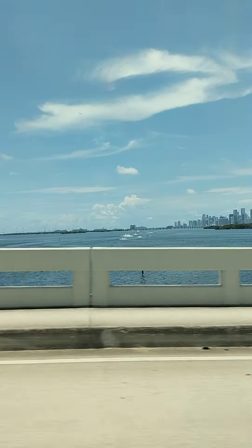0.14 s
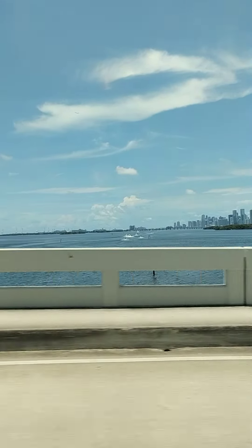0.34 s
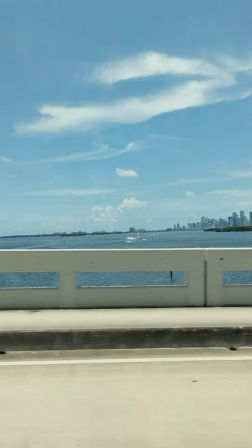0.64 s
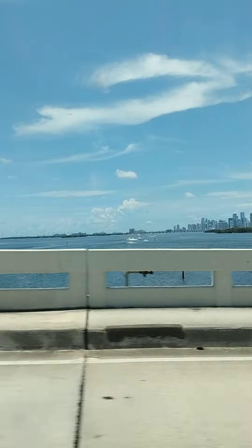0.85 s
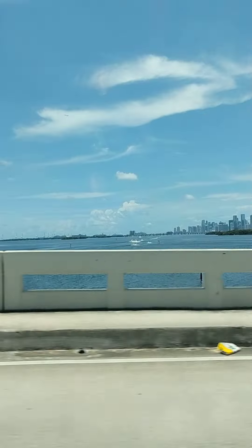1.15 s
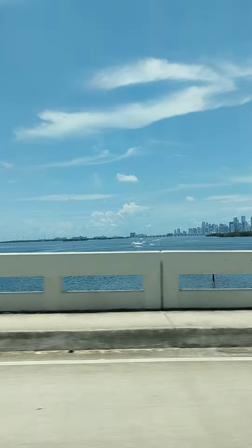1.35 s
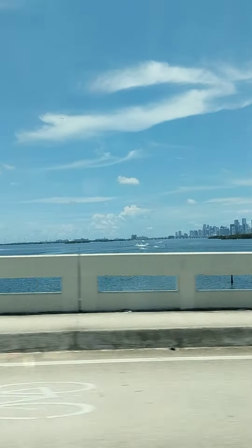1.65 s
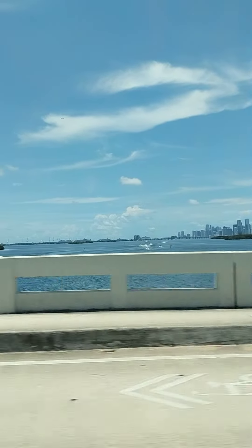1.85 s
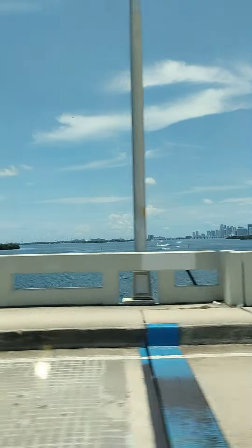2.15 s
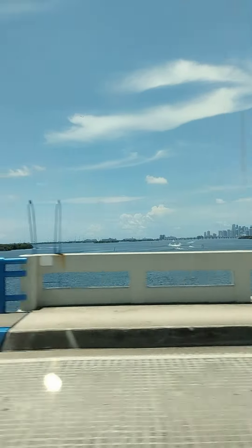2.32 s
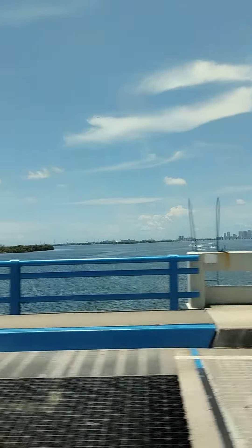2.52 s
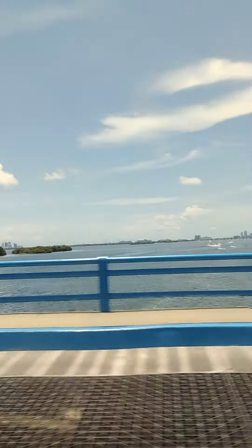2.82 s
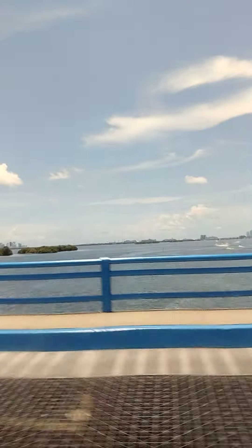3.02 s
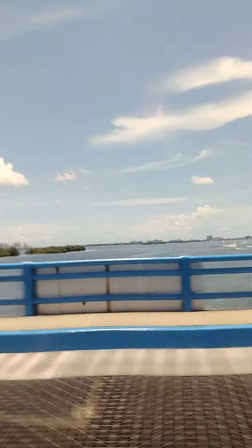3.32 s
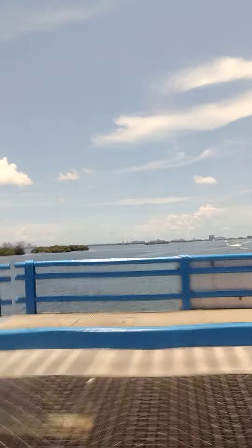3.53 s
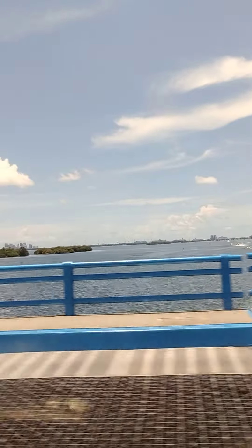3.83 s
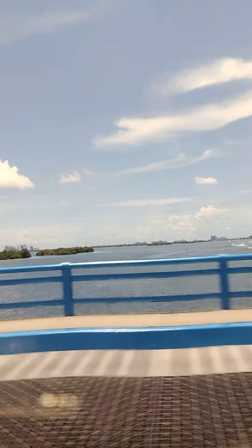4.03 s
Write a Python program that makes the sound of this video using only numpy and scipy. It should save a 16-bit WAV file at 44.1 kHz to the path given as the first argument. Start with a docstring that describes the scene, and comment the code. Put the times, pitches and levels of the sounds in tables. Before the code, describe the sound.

Car cabin road rumble with a few soft bumps, a short rasp, then a deep buzzing grate hum with jolts and small metallic clinks.

```python
"""Inside a car that crosses a concrete bridge and rolls onto an open steel grate deck.
Coloured noise gives the tyre rumble, the hiss and the thumps of rough patches; a ribbed slab rasps the tread.
On the grate the bars slap the tread: impulses ring body resonances, and sines drone on the bar rate and its octave.
Small loose metal ticks and clinks as decaying modes; trim knocks, buzzes and squeaks, and soft things scuff."""
import sys
import numpy as np
from scipy import signal
from scipy.fft import rfft, irfft, next_fast_len
from scipy.io import wavfile
from scipy.ndimage import uniform_filter1d

SR = 44100
rng = np.random.default_rng(int(sys.argv[2]) if len(sys.argv) > 2 else 0)


def generate_wav(signal):
    """Clip the signal to [-1, 1] and save it as 16-bit WAV at the path in sys.argv[1]."""
    frames = np.transpose(np.atleast_2d(signal))
    scaled = np.clip(frames, -1, 1) * 32767
    pcm = np.round(scaled).astype(np.int16)
    wavfile.write(sys.argv[1], SR, pcm)


N = 184117
TIME = np.arange(N) / SR

# Stereo field of the cabin: (frequency [Hz], left-right correlation [1], left-right balance [dB])
STEREO_FIELD = [(100, 1, 0.9), (280, 0.98, 0), (399, 0.88, 0), (563, 0.89, 5), (1012, 0.18, 2.5),
                (2200, 0, 0.5), (4170, 0, 1), (5600, 0.085, -10), (7000, 0, -4), (8700, 0.14, 14.5),
                (10500, 0.16, 11), (12500, 0.09, 2), (14840, 0, -1)]

# Roughness of the road, driving rumble and hiss: (time [s], rumble level [dB])
ROAD_ROUGHNESS = [(0.0, -30.5), (0.95, -30.5), (1.6, -32), (1.95, -31), (2.15, -29), (3.2, -33)]
# Spectrum of the road rumble: (frequency [Hz], relative density [dB per Hz])
ROAD_SPECTRUM = [(20, -19.5), (48, -16.5), (75, -7), (118, 0), (150, -5.5), (177, -4), (200, -10),
                 (300, -10), (350, -9.5), (385, -14), (425, -11), (510, -25.5), (650, -28.5), (800, -35)]
# Spectrum of tread and wind hiss: (frequency [Hz], relative density [dB per Hz])
HISS_SPECTRUM = [(500, 1.5), (780, 1), (1020, 0), (1250, -3.5), (1600, -10.5), (2200, -11.5), (2700, -18),
                 (3300, -24), (4300, -29), (6500, -26.5), (8000, -35), (9300, -30), (12000, -44.5),
                 (16000, -42.5)]
HISS_DB = -18   # tread and wind hiss through the glass, relative to the rumble
# Rough patches in the concrete: (time [s], level [dB], rise [s], t60 [s])
ROUGH_PATCHES = [(.86, -27.5, 0.029, 0.48), (0.944, -25.5, 0.01, 0.3), (1.061, -21, 0.016, 0.38),
                 (1.139, -31.5, 0.019, 0.33), (1.76, -34, 0.012, 0.76)]
# Spectrum of their thumps: (frequency [Hz], relative density [dB per Hz])
THUMP_SPECTRUM = [(25, -6.5), (50, -7), (80, -2), (120, 5.5), (180, -14), (300, -7.5), (450, -21.5),
                  (700, -29), (1100, -32)]

# Light ticks of dangling metal: (time [s], relative rms level [dB], frequency that rings most [Hz])
METAL_TICKS = [(.229, -46.5, 7160), (.441, -56.5, 8530), (.598, -59.5, 7110), (.814, -57, 10300),
               (1.222, -51.5, 7110), (1.4995, -61, 8600), (1.692, -54.5, 8850), (1.956, -53.5, 5840),
               (2.175, -43, 6340), (2.3905, -40, 6900), (2.713, -44.5, 7000), (2.749, -56.5, 8500),
               (2.958, -50, 7100), (3.008, -62, 9300), (3.509, -50, 5440), (3.626, -47, 8240),
               (4.005, -34.5, 8900), (4.036, -47, 8800), (4.052, -55, 9400), (4.152, -52.5, 8800)]
# Modes of the dangling metal: (frequency [Hz], relative level [dB], t60 [s], left-right balance [dB])
DANGLING_MODES = [(5480, 5, 0.039, -11), (6280, -4.5, 0.03, -12.5), (7130, -2.5, 0.073, -13),
                  (7210, -9, .04, 4), (8800, -3.5, .04, 16.5), (9200, -15, .02, 18.5),
                  (10330, -14, .03, 10.5), (14550, -12, .02, 0), (15400, -20.5, .02, -3)]
# Keys swinging together: (time [s], relative rms level [dB], frequency that rings most [Hz])
KEY_CLINKS = [(3.742, -35, 7450), (3.748, -35.5, 7450), (3.778, -38, 8820), (3.787, -39, 14900),
              (4.074, -54.5, 14900)]
# Modes of the keys: (frequency [Hz], relative level [dB], t60 [s], left-right balance [dB])
KEY_RING_MODES = [(2630, -8, 0.06, -4), (5650, -0.5, 0.22, -9), (6980, -14, 0.064, -11),
                  (7490, -4.5, 0.12, 18), (8450, -8, .09, 8), (8820, -6, 0.13, 18), (9400, -6, .04, 18),
                  (10500, -13, .04, 16), (11430, -6, 0.13, 11), (14300, -10, .04, -1),
                  (14900, -11, .12, -8)]
# Dry crack of metal on metal: (frequency [Hz], relative density [dB per Hz])
CRACK_SPECTRUM = [(3000, -11), (4600, -4), (5800, 4.5), (7200, -0.5), (7900, -13), (9400, -0.5),
                  (11500, -11), (13500, -13.5), (15500, -7.5)]
# Trim knocking and chattering: (time [s], level [dB], rise [s], t60 [s], relative treble [dB])
TRIM_KNOCKS = [(2.465, -51, 0.0078, 0.17, -14), (3.742, -41.5, 0.0085, 0.079, 12),
               (3.778, -30, 0.0055, 0.07, -1), (3.934, -35, 0.00092, 0.024, -13),
               (3.949, -31, 0.0017, 0.032, 10), (3.955, -29.5, 0.0039, 0.19, -12),
               (3.964, -35.5, 0.0018, 0.045, 22), (3.988, -38.5, .005, 0.15, -15)]
# Spectrum of the knocks: (frequency [Hz], relative density [dB per Hz])
KNOCK_SPECTRUM = [(600, 14), (1300, 2), (2000, 4), (2500, 0.5), (3600, -7.5), (4500, -12), (5600, -4),
                  (7500, -24), (9500, -11.5), (11500, -27), (15500, -28)]
# Soft things sliding in the cabin: (time [s], level [dB], rise [s], t60 [s], relative treble [dB])
SOFT_SCUFFS = [(0.0, -42, 0.0061, 0.14, 8), (.21, -55.5, .02, 0.32, 5), (.475, -57.5, .015, .15, -7),
               (.785, -52, 0.0031, 0.41, 2), (1.695, -62, .015, 0.66, -10),
               (2.06, -58.5, 0.022, 0.58, -3.5), (2.74, -62, 0.024, 0.61, 10.5),
               (3.84, -47, 0.025, 0.21, -31)]
# Spectrum of the scuffs: (frequency [Hz], relative density [dB per Hz])
SCUFF_SPECTRUM = [(2000, -11.5), (3100, -1), (3850, -1), (4600, -3.5), (6300, -13), (7800, -15),
                  (9400, -13.5), (11500, -30), (16000, -29)]
# Trim squeaking and creaking: (time [s], frequency [Hz], nominal width [Hz], level [dB], t60 [s])
TRIM_SQUEAKS = [(.79, 3820, 9, -60, .75), (3.494, 1800, 400, -52, .06), (3.507, 1620, 220, -39.5, .07),
                (3.51, 5800, 600, -46, .05), (3.525, 1800, 400, -43.5, .08)]
# Spectrum of the buzzing trim: (frequency [Hz], relative density [dB per Hz])
BUZZ_SPECTRUM = [(800, -5), (1500, -1), (1850, -9.5), (2400, -3), (3500, -12.5), (5300, -19.5), (7500, -25),
                 (9400, -24), (11500, -32), (16000, -35)]
# The stronger buzz around the second joint
BUZZ_START_S, BUZZ_DB, BUZZ_RISE_S, BUZZ_T60_S = 3.563, -46, 0.36, 7.7
BUZZ_ON_DECK_DB = -40.5   # faint buzz all along the grate, relative to the shaking

# Rasp of the ribbed lead-in: (frequency [Hz], relative density [dB per Hz])
RIBS_SPECTRUM = [(750, -4.5), (980, 8.5), (1300, -1), (1700, -15.5), (2300, -15.5), (2900, -19)]
RIBS_END_S = 2.47   # the front tyres rasp most as they leave the ribs
RIBS_DB, RIBS_REAR_DB = -43.5, -4.5   # peak level; rear axle relative to the front
RIBS_RISE_DB_PER_S, RIBS_FALL_DB_PER_S = 73, 129.5

# How hard the deck shakes the car: (time [s], reference level [dB])
DECK_SHAKING = [(2.25, -35.5), (2.42, -29.5), (2.65, -22), (2.9, -20.5), (3.1, -21.5), (3.6, -22),
                (3.8, -20.5), (4.17, -19.5)]
# Spectrum of the deck roar: (frequency [Hz], relative density [dB per Hz])
ROAR_SPECTRUM = [(165, 7), (200, -1.5), (250, 2), (300, 0.5), (370, -3.5), (450, -14), (520, -12),
                 (690, -16.5), (770, -27.5), (900, -48.5)]
# Spectrum of the body heaving: (frequency [Hz], relative density [dB per Hz])
HEAVE_SPECTRUM = [(12, -19.5), (25, -11.5), (40, -7.5), (50, -3), (60, -5), (75, -27.5)]
# Rate at which the tyres meet bars: (time [s], bar rate [1/s])
BARS_PER_S = [(2.35, 68), (2.55, 70), (2.9, 73), (3.15, 74), (3.35, 76), (3.62, 73.5), (3.8, 75),
              (4.17, 73.5)]
# Hum on the octave of the bar rate: (time [s], level [dB])
HUM_LEVEL = [(2.15, -20.5), (2.3, -25), (2.48, -15.5), (3.0, -15), (3.38, -9.5), (3.62, -13), (3.75, -15),
             (4.17, -22.5)]
# Brief sags of the hum: (time [s], half length [s])
HUM_SAGS = [(2.62, 0.026), (2.742, 0.0099), (2.855, 0.011), (2.982, 0.027), (3.122, .025), (3.343, 0.02),
            (3.465, 0.034), (3.677, 0.019)]
SAG_DEPTH_DB = 13
# Cabin modes that boom along with the hum: (frequency [Hz], level relative to the hum [dB])
CABIN_BOOMS = [(299.5, -11.8), (370, -20.5)]
# Panel, glass and air resonances: (frequency [Hz], nominal width [Hz], relative level [dB])
PANEL_MODES = [(177, 32, 2.5), (228, 30, 1), (272.6, 18, -4), (301.4, 19, -0.5), (337.3, 22, -4),
               (371.3, 18, -3.5), (451, 40, -5), (555, 74, -18.5), (668, 55, -21), (1180, 190, -29.5),
               (2215, 120, -33)]
# Resonances of the shaking wheels: (frequency [Hz], nominal width [Hz], relative level [dB])
WHEEL_RESONANCES = [(96, 14, -2), (120.5, 13.9, -1)]
# Joints across the deck: (time [s], heave [dB], wheel shake [dB], reference judder [dB])
DECK_JOINTS = [(2.315, -39, -28.5, -30.5), (3.737, -28, -15.5, -23)]
JOINT_RISE_S, JOINT_T60_S = 0.021, 0.81
AXLE_LAG_S = .205   # the rear axle follows the front
WHEEL_TURNS_PER_S, THROB_LOW_S = 5.95, 2.675   # turning rate; a moment when the throb is lowest
THROB_SHARE = 0.35   # the lowest note throbs once per wheel turn

CUTOFF_HZ = 15900


def from_db(db):
    """Logarithmic level: decibels to amplitude gain."""
    return 10 ** (np.asarray(db) / 20)


def rms_one(x):
    """Power normalisation: scale to unit mean square."""
    return x / np.sqrt(np.mean(x ** 2) + 1e-20)


def in_time(rows):
    """Linear interpolation: each column of a curve at every sample."""
    times, *columns = np.transpose(rows)
    return [np.interp(TIME, times, column) for column in columns]


def at_hz(rows, hz):
    """Interpolation over log frequency: each column of a spectrum at the given frequencies."""
    points, *columns = np.transpose(rows)
    return [np.interp(np.log(hz + 1e-3), np.log(points), column) for column in columns]


def pan(db):
    """Constant-power panning: left and right gains for a level difference."""
    gains = from_db(np.array([np.atleast_1d(db), -np.atleast_1d(db)]) / 2)
    return gains / np.sqrt(np.mean(gains ** 2, axis=0))


def drift(rate_hz):
    """Low-passed noise: a slow random fluctuation of unit spread."""
    hz = np.fft.rfftfreq(2 * N, 1 / SR)[:2000]
    spectrum = rfft(rng.standard_normal(2 * len(hz) - 2))
    slow = irfft(spectrum / (1 + (hz / rate_hz) ** 2))
    return rms_one(np.interp(np.linspace(0, len(hz), N), np.arange(len(slow)), slow))


def steady(x, seconds):
    """Running power normalisation: near unit power over every stretch of this length."""
    power = np.mean(np.atleast_2d(x) ** 2, axis=0)
    return x / np.sqrt(uniform_filter1d(power, max(int(seconds * SR), 2)) + 1e-12)


def swell(start_s, rise_s, t60):
    """Exponential decay: a straight rise, then a fall of 60 dB per t60."""
    out = np.zeros(N)
    sounding = slice(max(int(start_s * SR), 0), int((start_s + rise_s + 1.5 * t60) * SR))
    age = np.maximum(TIME[sounding] - start_s, 0)
    decay = np.exp(-np.log(1000) * np.maximum(age - rise_s, 0) / t60)
    out[sounding] = np.minimum(age / rise_s, 1) * decay
    return out


def resonate(x, hz, width_hz):
    """Damped resonance: a pole pair with gain 1 at its peak."""
    r = np.exp(-np.pi * width_hz / SR)
    zeros = np.array([1, 0, -1]) * (1 - r * r) / 2
    poles = [1, -2 * r * np.cos(2 * np.pi * hz / SR), r * r]
    return signal.lfilter(zeros, poles, x + 1e-18)


def cabin_noise(colour):
    """Diffuse-field coherence: coloured stereo noise, alike on both sides in the bass, diffuse in the treble."""
    size = next_fast_len(N)
    hz = np.fft.rfftfreq(size, 1 / SR)
    mid, side = rfft(rng.standard_normal((2, size)))
    alike, balance_db = at_hz(STEREO_FIELD, hz)
    alike = np.clip(alike, -1, 1)
    both = np.sqrt(1 + alike) * mid + np.sqrt(1 - alike) * side * [[1], [-1]]
    # fade out beyond both ends of the spectrum table
    top = 1 / (1 + (hz / colour[-1][0] / 1.2) ** 8)
    bottom = 1 / (1 + (colour[0][0] / 1.2 / (hz + 1)) ** 8)
    shaped = both * pan(balance_db) * top * bottom * from_db(at_hz(colour, hz)[0])
    return rms_one(irfft(shaped, size)[:, :N])


def jolts():
    """Transient excitation: heave, wheel shake and judder as front, then rear axle strikes each joint."""
    out = 0
    for joint_s, *levels_db in DECK_JOINTS:
        for lag_s in (0, AXLE_LAG_S):
            out = out + from_db(levels_db)[:, None] * swell(joint_s + lag_s, JOINT_RISE_S, JOINT_T60_S)
    return out


def road():
    """Random excitation: coarse concrete shakes the body, rough patches thump; tread and wind hiss above."""
    road_db, = in_time(ROAD_ROUGHNESS)
    bumps = sum(from_db(db) * swell(start_s, rise_s, t60) for start_s, db, rise_s, t60 in ROUGH_PATCHES)
    thumps = bumps * steady(cabin_noise(THUMP_SPECTRUM), seconds=0.14)
    rumble = from_db(road_db) * steady(cabin_noise(ROAD_SPECTRUM), seconds=.06)
    rolling_hiss = from_db(road_db + HISS_DB + 0.89 * drift(10.0))
    joint_hiss = from_db(-20.0) * jolts()[0]   # follows the heave at the joints
    hiss = np.hypot(rolling_hiss, joint_hiss) * cabin_noise(HISS_SPECTRUM)
    return rumble + thumps + hiss


def trim_buzz():
    """Vibration-driven contact noise: trim buzzes with the deck, far more around the second joint."""
    jolted = from_db(BUZZ_DB) * swell(BUZZ_START_S, BUZZ_RISE_S, BUZZ_T60_S)
    shaken = from_db(in_time(DECK_SHAKING)[0] + BUZZ_ON_DECK_DB)
    return np.hypot(jolted, shaken) * from_db(2.4 * drift(120)) * cabin_noise(BUZZ_SPECTRUM)


def bursts(hits, colour, grain_db):
    """Contact noise: grainy bursts swell and die, each with its own share of treble."""
    noise = cabin_noise(colour) * from_db(grain_db * drift(250))
    dull = signal.sosfilt(signal.butter(2, 4000, fs=SR, output="sos"), noise)
    bright = signal.sosfilt(signal.butter(2, 4600, "high", fs=SR, output="sos"), noise)
    out = 0
    for start_s, db, rise_s, t60, treble_db in hits:
        # opposite sign keeps the two bands from cancelling where they cross
        grain = rms_one(dull - from_db(treble_db) * bright)
        out = out + from_db(db) * swell(start_s, rise_s, t60) * grain
    return out


def squeak(hz, width_hz):
    """Stick-slip friction: noise through one sharp resonance, held at nearly even level."""
    once = resonate(rng.standard_normal((2, N)), hz, 1.9 * width_hz)
    twice = resonate(once, hz, 1.9 * width_hz)
    return steady(twice, seconds=min(2 / width_hz, .01))


def metal(hits, modes, chatter_s, favour_db, crack_db, crack_t60, uneven_db):
    """Modal excitation: a dry crack and a brief chatter into the modes; the place struck favours some."""
    cracks = sum(from_db(db + crack_db) * swell(start_s, 0.0014, crack_t60) for start_s, db, _ in hits)
    out = cracks * cabin_noise(CRACK_SPECTRUM)
    t = TIME[:SR // 7]
    for start_s, db, strong_hz in hits:
        sound = 0
        for hz, mode_db, t60, side_db in modes:
            contact = rng.standard_normal((2, len(t))) * np.exp(-t / chatter_s)
            width_hz = np.log(1000) / (np.pi * t60)
            ring = np.array([rms_one(channel) for channel in resonate(contact, hz, width_hz)])
            favoured = np.exp(-((hz - strong_hz) / 250) ** 2)
            level_db = mode_db + favour_db * favoured + uneven_db * rng.uniform(-1, 1)
            sound = sound + from_db(level_db) * pan(side_db) * ring
        sound = sound / np.sqrt(np.mean(sound[:, :SR // 50] ** 2))   # unit power over the first 20 ms
        start = int(start_s * SR)
        out[:, start:start + len(t)] += from_db(db) * sound[:, :N - start]
    return out


def loose_things():
    """Superposition: ticks, keys, squeaks, knocks, scuffs and buzz that the shaking sets off add up."""
    ticks = from_db(-3.5) * metal(METAL_TICKS, DANGLING_MODES, chatter_s=0.0036, favour_db=11.0,
                                  crack_db=-3.5, crack_t60=0.061, uneven_db=3.5)
    keys = from_db(-1.2) * metal(KEY_CLINKS, KEY_RING_MODES, chatter_s=.003, favour_db=11.0,
                                 crack_db=-1.8, crack_t60=.085, uneven_db=1.0)
    squeaks = 0
    for start_s, hz, width_hz, db, t60 in TRIM_SQUEAKS:
        squeaks = squeaks + from_db(db) * swell(start_s, 0.004, t60) * squeak(hz, width_hz)
    knocks = bursts(TRIM_KNOCKS, KNOCK_SPECTRUM, grain_db=-1.5)
    scuffs = bursts(SOFT_SCUFFS, SCUFF_SPECTRUM, grain_db=1.5)
    return ticks + keys + squeaks + knocks + scuffs + trim_buzz()


def ribs():
    """Tread excitation: the ribbed slab before the grate makes the tread rasp, once for each axle."""
    level = 0
    for lag_s, axle_db in ((0, 0), (AXLE_LAG_S, RIBS_REAR_DB)):
        age = TIME - RIBS_END_S - lag_s
        slope_db = np.minimum(RIBS_RISE_DB_PER_S * age, -RIBS_FALL_DB_PER_S * age)
        level = np.hypot(level, from_db(RIBS_DB + axle_db + slope_db))
    return level * from_db(1.1 * drift(60)) * cabin_noise(RIBS_SPECTRUM)


def bar_slaps(bars, modes, scatter, uneven_db):
    """Impulse excitation of modes: four tyres meet each bar a little early or late, in bars of scatter."""
    tyres = []
    for _ in range(4):
        passed = np.floor(bars + rng.random() + scatter * drift(25))
        tyres.append(np.flatnonzero(np.diff(passed) > 0))
    at = np.concatenate(tyres)
    out = np.zeros(N)
    for hz, width_hz, db in modes:
        strengths = from_db(uneven_db * rng.uniform(-2, 1.6, len(at)))
        slaps = np.bincount(at, strengths, N)
        once = resonate(slaps, hz, 1.17 * width_hz)
        out += from_db(db) * rms_one(resonate(once, hz, 1.17 * width_hz))
    return steady(out, seconds=0.11)


def drone(bars, deck_db):
    """Periodic excitation: a throbbing note on the bar rate, a wavering hum on its octave, and cabin booms."""
    hum_db, = in_time(HUM_LEVEL)
    sag_db = SAG_DEPTH_DB * sum(np.exp(-((TIME - sag_s) / half_s) ** 2) for sag_s, half_s in HUM_SAGS)
    throb = 1 - THROB_SHARE * np.cos(2 * np.pi * WHEEL_TURNS_PER_S * (TIME - THROB_LOW_S))
    # (time [s], share of the tone [1]) as each axle comes onto the grate
    front_on, = in_time([(2.43, 0.05), (2.51, 0.92)])
    rear_on, = in_time([(2.63, 0.45), (2.72, 0.96)])
    low_level = rear_on * throb * from_db(deck_db + 3.5 + 1.0 * drift(11))
    low = low_level * np.sin(2 * np.pi * (bars + 0.076 * drift(8.7)))
    hum_level = from_db(hum_db - sag_db + 1.7 * drift(18))
    hum = hum_level * np.sin(2 * np.pi * (2 * bars + .085 * drift(9)))
    booms = 0
    for hz, db in CABIN_BOOMS:
        boom_level = from_db(hum_db + db + 2.5 * drift(13))
        booms = booms + boom_level * np.sin(2 * np.pi * (hz * TIME + 0.11 * drift(4.4)))
    return low + hum + front_on * booms


def grate():
    """Forced vibration: regular bars give the drone; bars and joints give judder, wheel shake, roar and heave."""
    bars = np.cumsum(in_time(BARS_PER_S)[0]) / SR   # bars passed so far
    deck_db, = in_time(DECK_SHAKING)
    joint_heave, joint_shake, joint_judder = jolts()
    judder_level = np.hypot(from_db(deck_db - 4.0), from_db(-4.5) * joint_judder)
    judder = judder_level * bar_slaps(bars, PANEL_MODES, scatter=.25, uneven_db=7.0)
    shake_level = np.hypot(from_db(deck_db + 0.2), joint_shake)
    shake = shake_level * bar_slaps(bars, WHEEL_RESONANCES, scatter=.3, uneven_db=0.0)
    roar_level = np.hypot(from_db(deck_db - 2.0), joint_judder)
    roar = roar_level * steady(cabin_noise(ROAR_SPECTRUM), seconds=0.13)
    heave_level = np.hypot(from_db(deck_db - 23.0), joint_heave)
    heave = heave_level * steady(cabin_noise(HEAVE_SPECTRUM), seconds=0.18)
    on_deck, = in_time([(2.1, 0.013), (2.33, 0.99)])   # (time [s], gain [1])
    return on_deck * ((drone(bars, deck_db) + judder + shake) * pan(1.0) + roar + heave)


def scene():
    """Superposition: road, rattles, ribbed slab and grate add up inside the cabin."""
    return road() + loose_things() + ribs() + grate()


def record(dry):
    """Soft saturation and band limiting: the loudest peaks are rounded and the top is cut steeply."""
    rounded = dry / (1 + (np.abs(dry) / .8) ** 8) ** (1 / 8)
    steep_cut = signal.ellip(10, .1, 80, CUTOFF_HZ, fs=SR, output="sos")
    return signal.sosfilt(steep_cut, rounded)


dry = scene()
out = record(dry)
generate_wav(out)
```